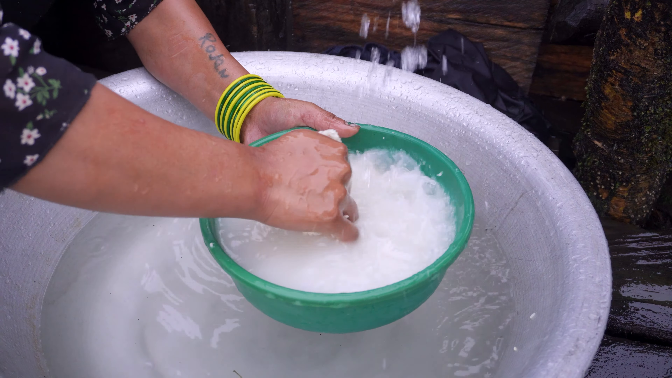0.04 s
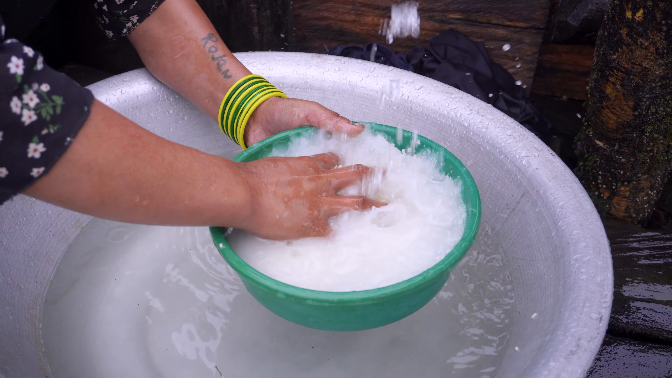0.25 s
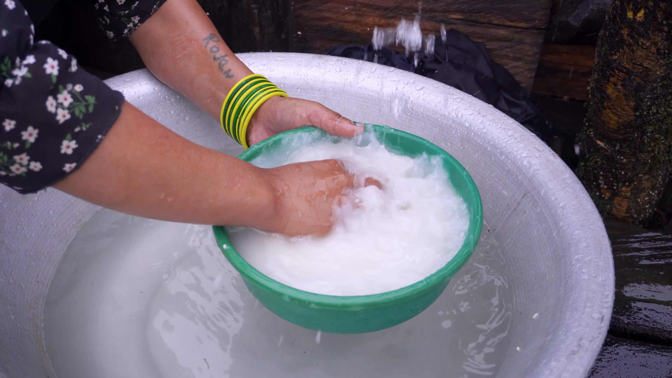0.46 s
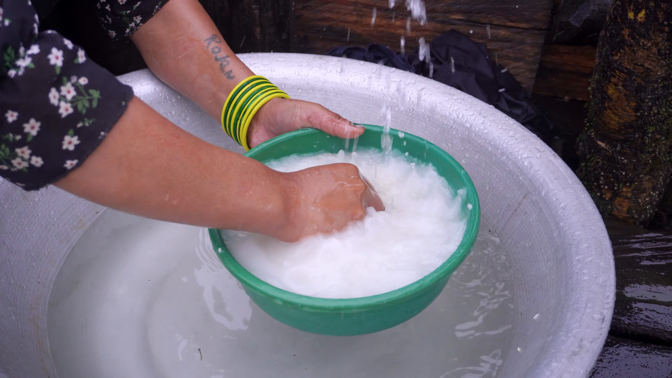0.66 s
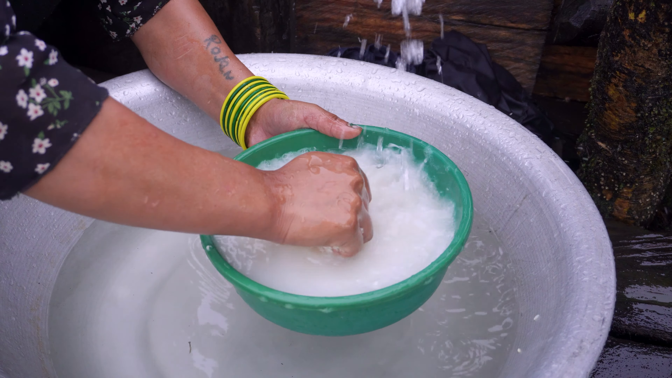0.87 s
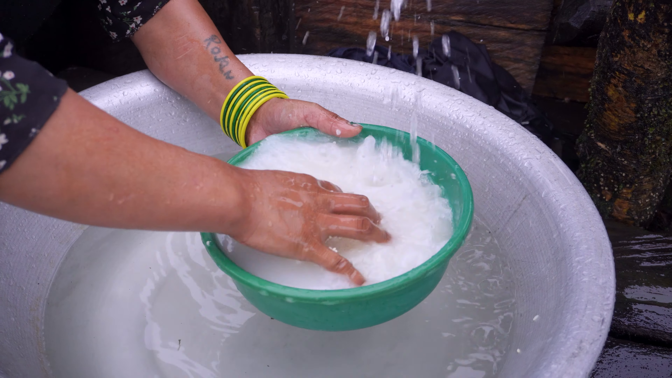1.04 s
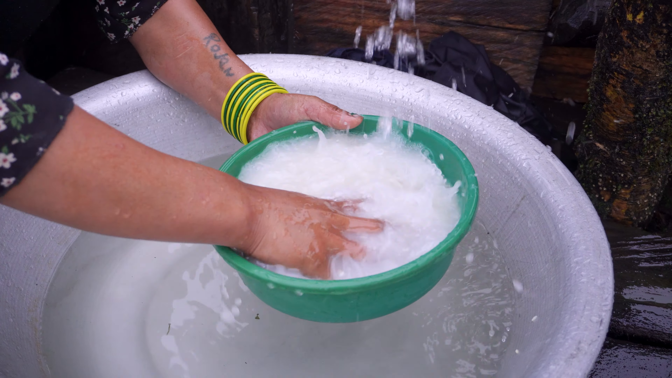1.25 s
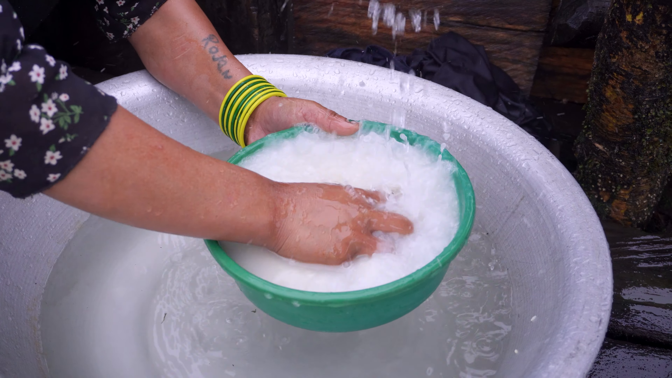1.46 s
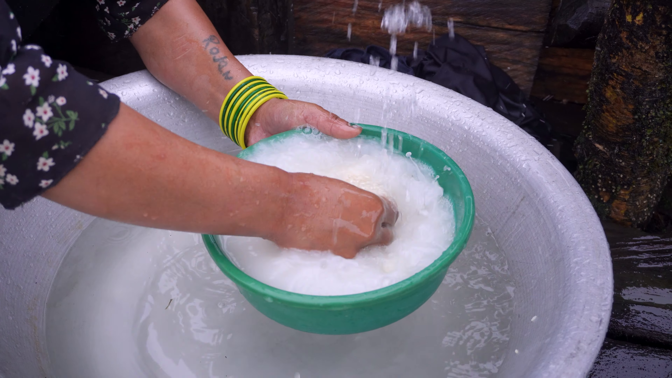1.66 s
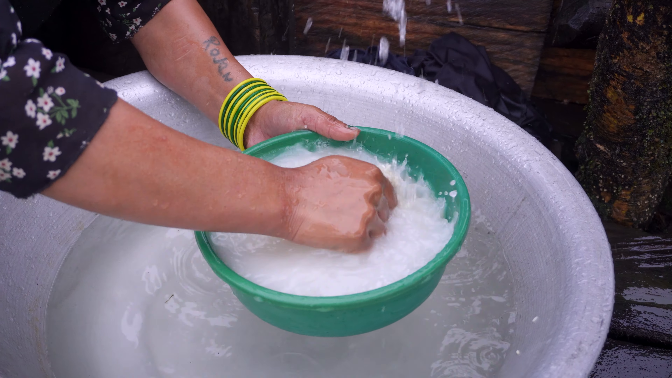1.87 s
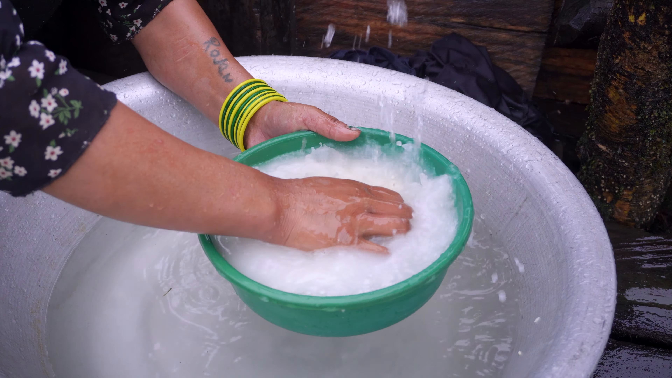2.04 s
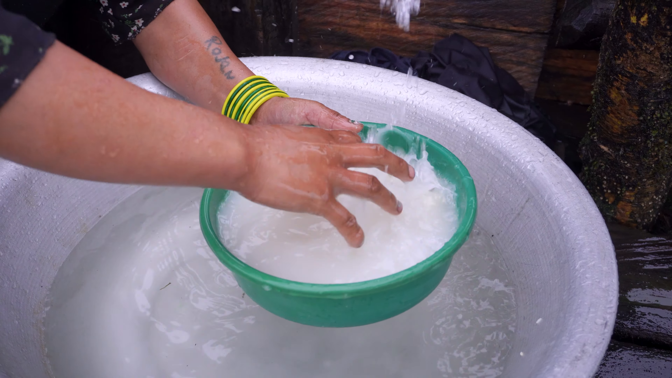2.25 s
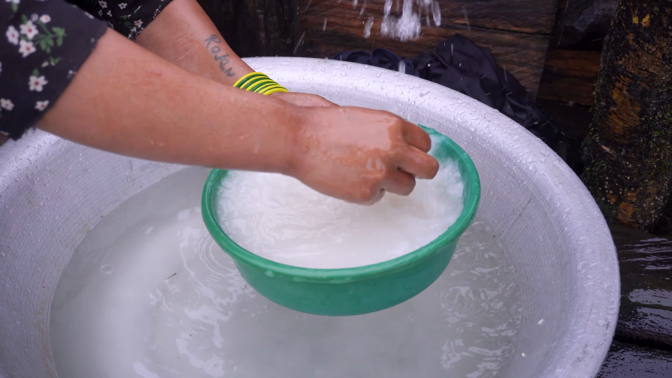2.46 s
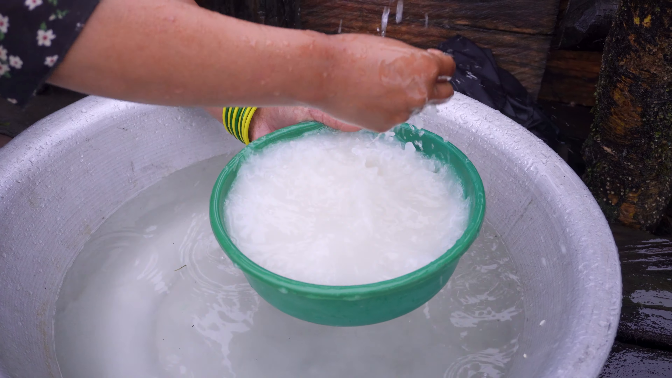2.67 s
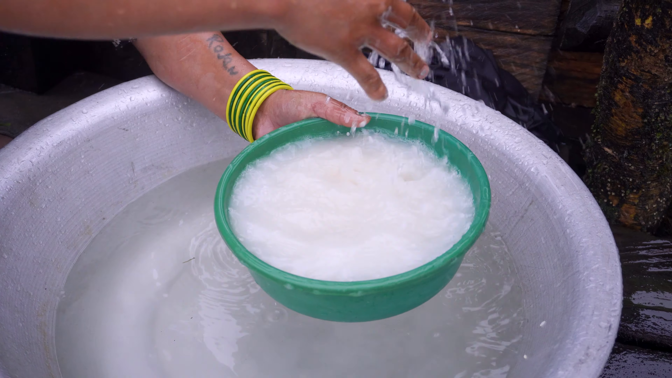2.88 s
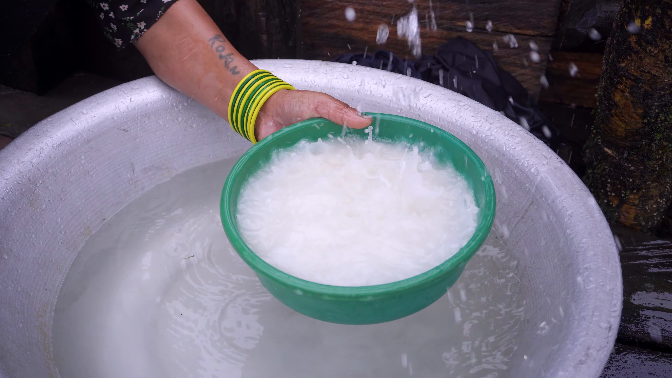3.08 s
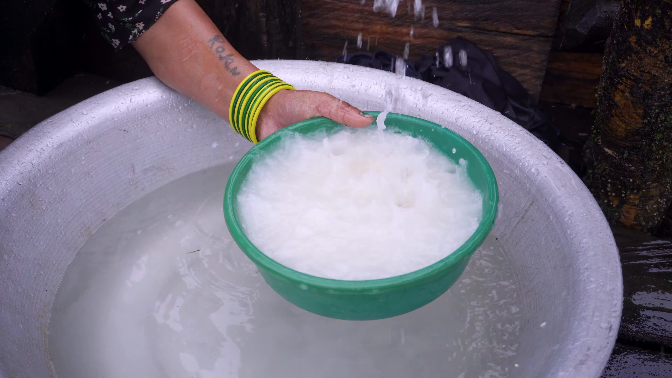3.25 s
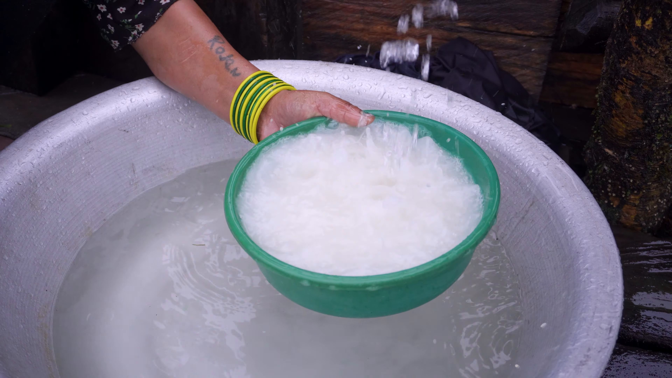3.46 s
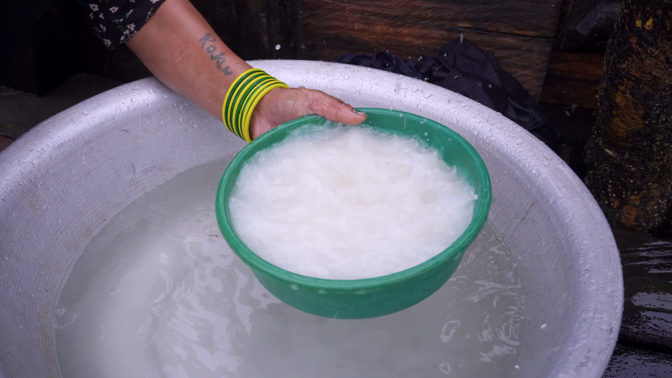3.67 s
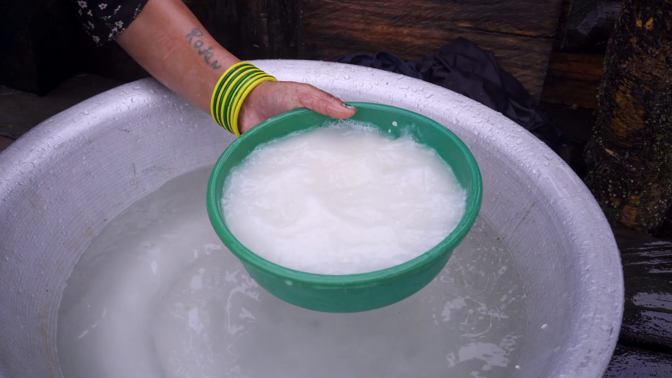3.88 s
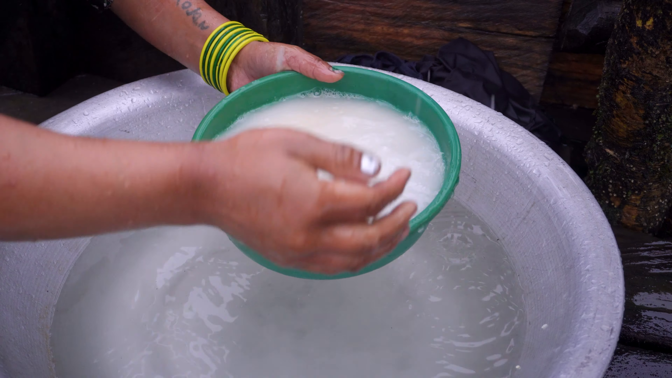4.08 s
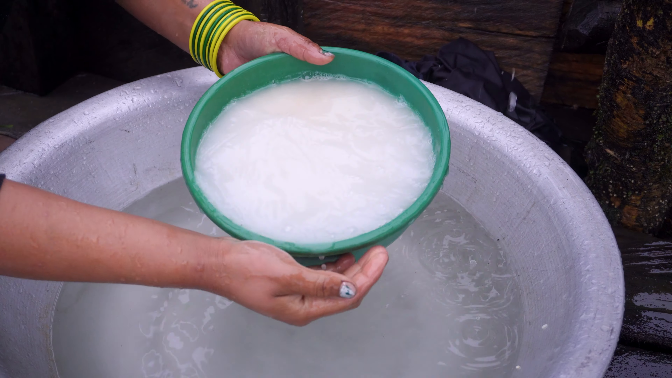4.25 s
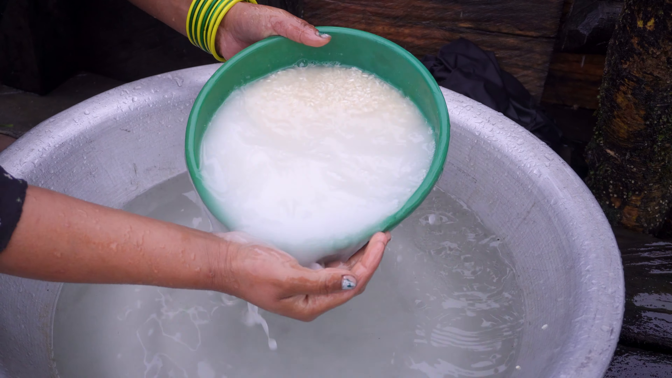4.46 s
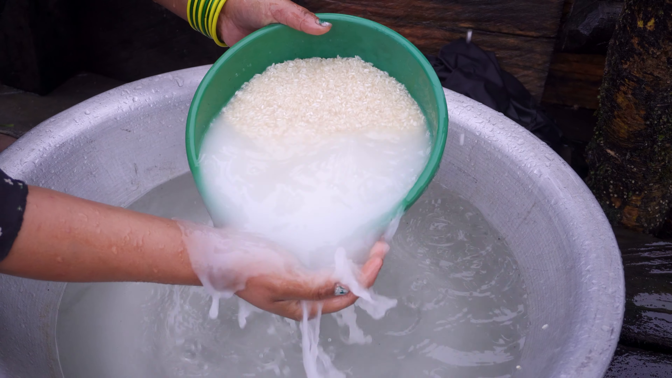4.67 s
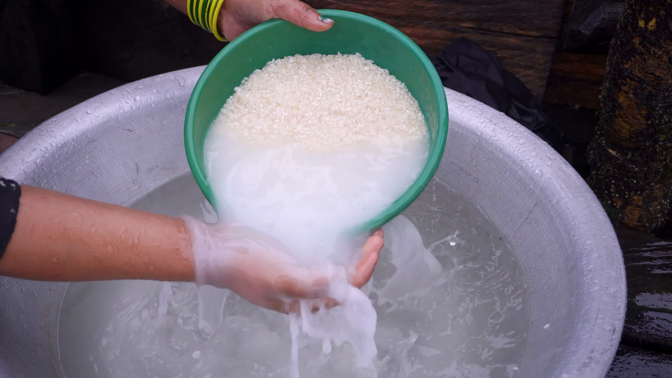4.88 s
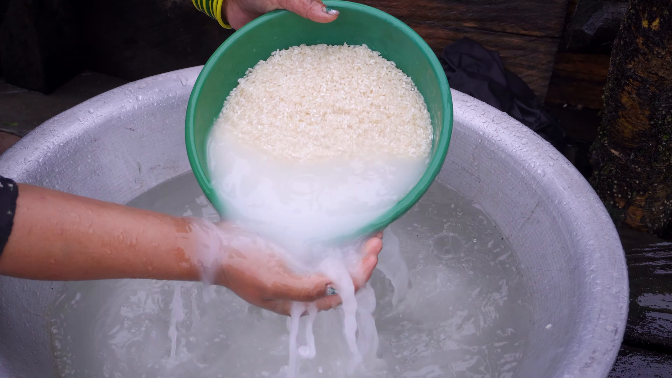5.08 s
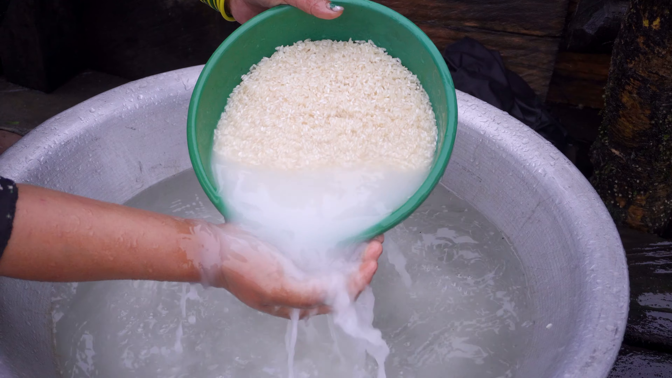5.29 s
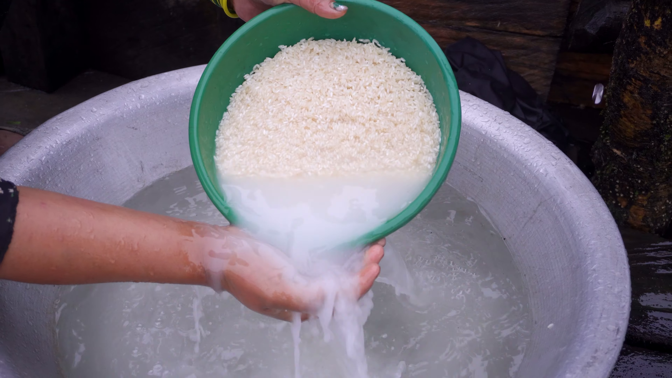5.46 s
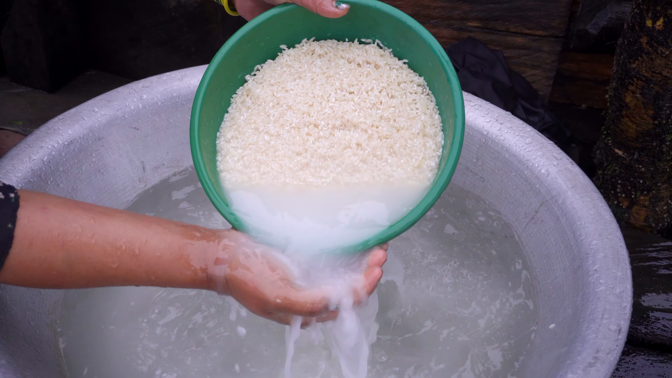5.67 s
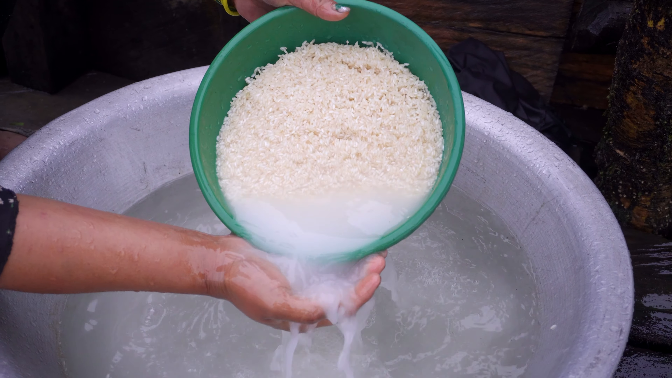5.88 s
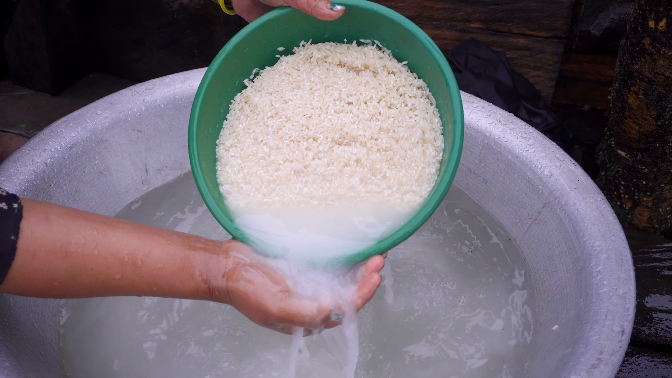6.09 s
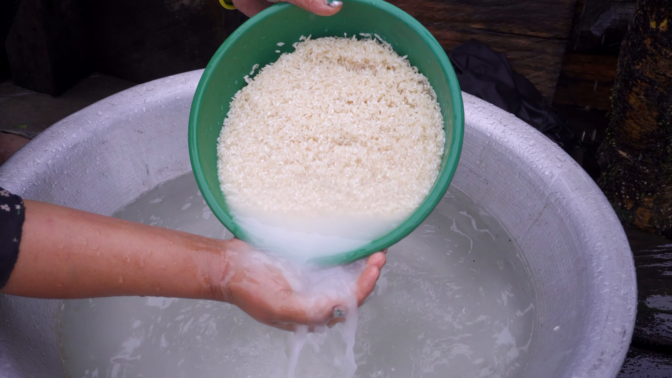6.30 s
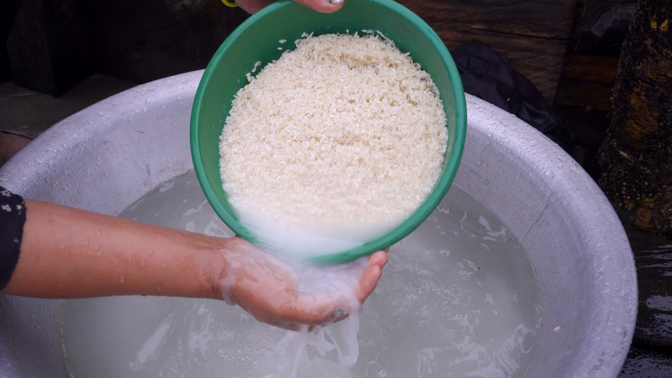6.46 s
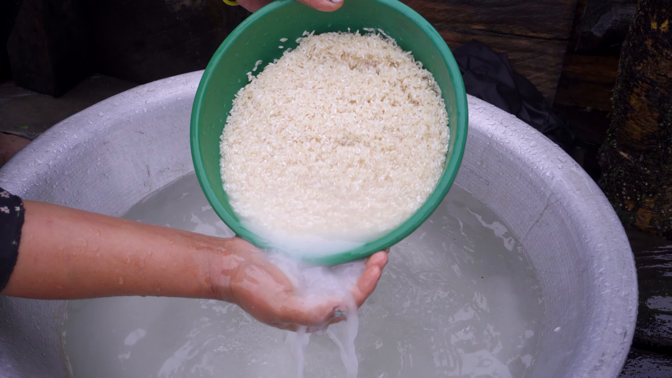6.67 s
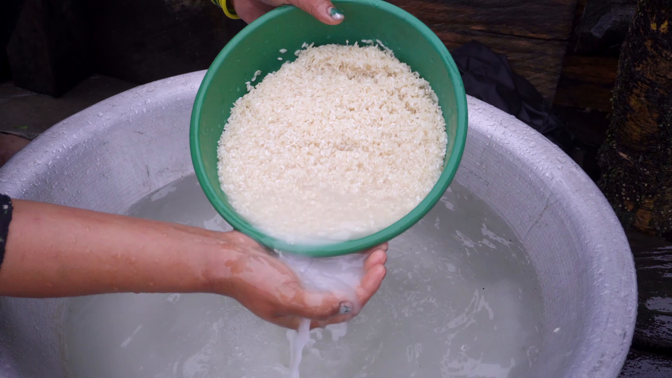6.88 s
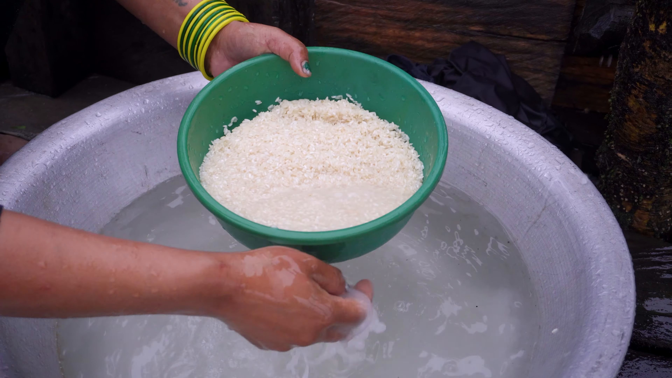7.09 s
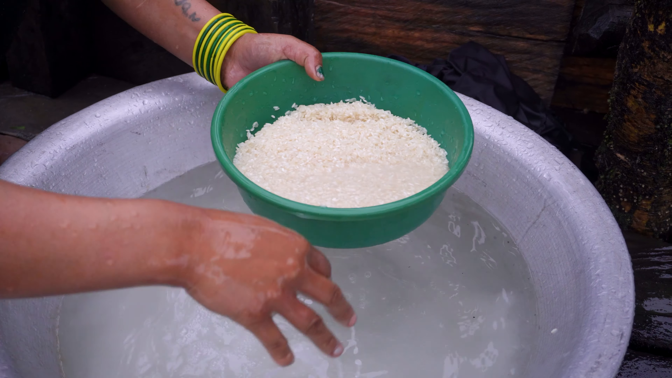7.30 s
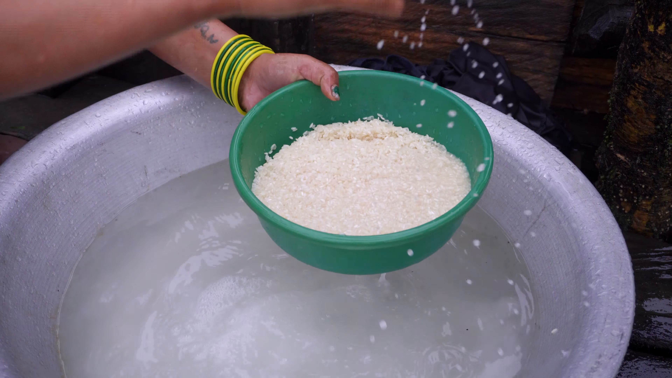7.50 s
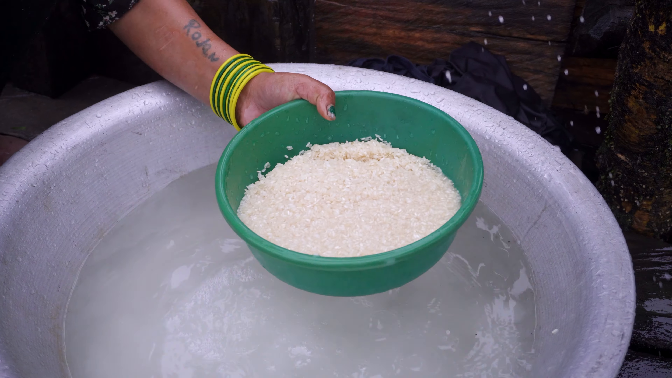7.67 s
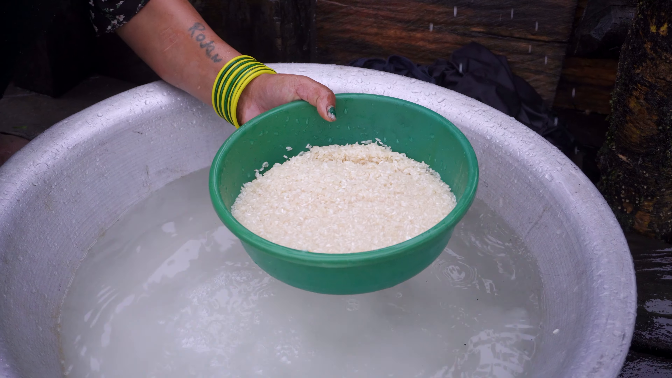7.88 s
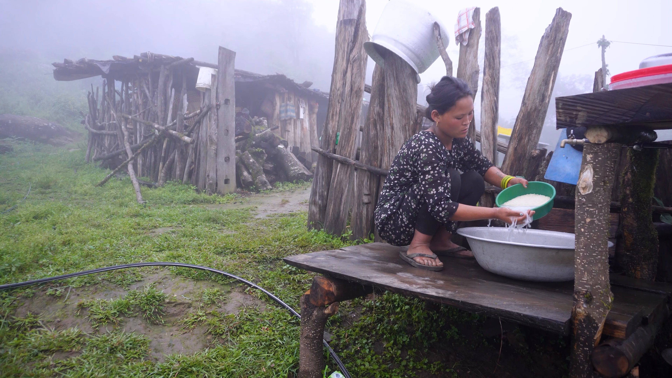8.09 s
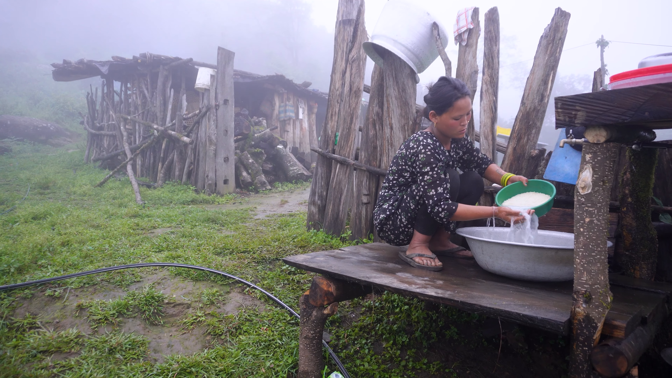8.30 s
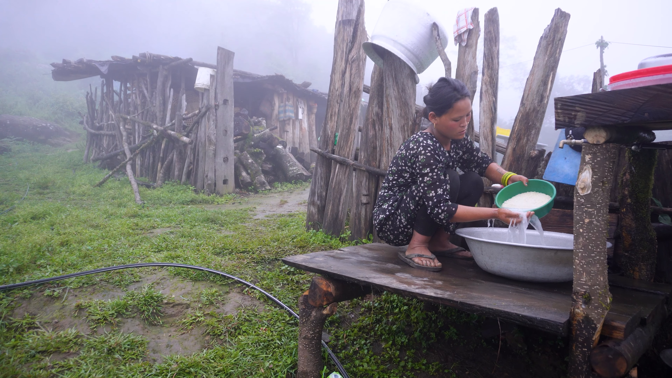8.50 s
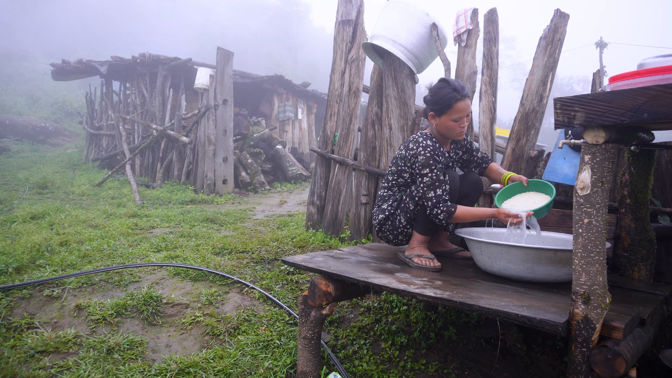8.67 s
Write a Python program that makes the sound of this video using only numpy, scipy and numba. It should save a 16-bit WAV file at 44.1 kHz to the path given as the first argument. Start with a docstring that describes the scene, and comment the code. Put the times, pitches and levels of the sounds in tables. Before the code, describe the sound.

Close plinking and spattering water drops with small plops, a lull, a gurgling pour over a cupped hand, then a more distant, deeper trickle outdoors.

```python
"""Water falls in drops into a bowl of soaking rice, stops, is poured off over a hand into a metal basin,
and is poured again further away. Each impact spatters, as short bursts of noise, and traps air that rings as
damped sines: clear drops plink, and other bubbles hold or slide in pitch, from low plops to high far-off drips.
Quick reflections follow from the basin. Faint birds and a hum are thin wavering tones in the damp air, which
is soft coloured noise."""
import sys
import numpy as np
from scipy import signal
from scipy.fft import rfft, irfft
from scipy.io import wavfile
from scipy.ndimage import uniform_filter1d
from numba import njit

SR = 44100
rng = np.random.default_rng(int(sys.argv[2]) if len(sys.argv) > 2 else 0)


def output_pcm(signal):
    """Save a mono or channel-first signal as 16-bit PCM at the path in sys.argv[1].

    Samples are clipped to [-1, 1] before scaling.
    """
    pcm = np.clip(np.atleast_2d(signal).T, -1, 1) * 32767
    wavfile.write(sys.argv[1], SR, np.round(pcm).astype(np.int16))


N = 385434
TIME = np.arange(N) / SR
OPPOSITE = np.array([[1], [-1]])  # signs of the side signal, left and right


def undb(db):
    """Level law: decibels to an amplitude ratio."""
    return 10 ** (np.asarray(db) / 20)


def read(table, hz):
    """Spectral interpolation: read a (Hz, dB) table on a log-frequency axis."""
    table_hz, table_db = np.array(table).T
    return np.interp(np.log(hz + 1), np.log(table_hz), table_db)


def colour(x, table):
    """Linear filtering: weight the spectrum by a (Hz, dB) table."""
    gain = undb(read(table, np.fft.rfftfreq(N, 1 / SR)))
    return irfft(rfft(x) * gain, N)


def filtered(x, order, hz, kind="low"):
    """Butterworth filtering: a maximally flat passband."""
    return signal.sosfilt(signal.butter(order, hz, kind, fs=SR, output="sos"), x)


def unit(x):
    """Normalisation: scale to an rms of 1."""
    return x / np.sqrt(np.mean(x ** 2))


def wander(samples):
    """Random modulation: twice-smoothed noise of rms 1; a longer window makes it slower."""
    noise = rng.standard_normal(N)
    return unit(uniform_filter1d(uniform_filter1d(noise, size=samples), size=samples))


def rare(chance):
    """Truncated exponential statistics: mostly small, now and then large, never huge."""
    return np.minimum(-np.log(chance), 3.6)


# Unlike part of the two channels. Each row: frequency in Hz, level against the like part in dB.
UNLIKE_PART = [(40, -36), (150, -10.5), (2000, -8), (4000, -2.5), (15000, -9)]


def hiss(table):
    """Partial coherence: two-channel noise of rms 1, mostly alike left and right."""
    mid, side = rng.standard_normal((2, N))
    return unit(colour(mid + colour(side, UNLIKE_PART) * OPPOSITE, table))


@njit
def ring(n, start, hz, cycles, size, glide, pan, rise):
    """Damped resonance: bubbles swell over `rise` cycles, fade over `cycles` and may climb ever faster in pitch."""
    out = np.zeros((2, n))
    for k in range(len(start)):
        step = 2 * np.pi * hz[k] / SR
        phase, fade, onset = 0., 1., 1.
        fade_step = np.exp(-hz[k] / SR / cycles[k])
        onset_step = np.exp(-hz[k] / SR / rise)
        for i in range(start[k], n):
            phase += step
            # the climb quickens as the bubble nears the surface
            step = min(step * (1 + 2 * (glide[k] - 1) * (1 - fade)), 2.5)
            fade *= fade_step
            onset *= onset_step
            value = size[k] * fade * (1 - onset) * np.sin(phase)
            out[0, i] += value * pan[k]
            out[1, i] += value / pan[k]
            if fade < .003:
                break
    return out


def bubbles(s, hz, cycles, db, octaves, pan_db, rise):
    """Bubble resonance: bubbles at times s; `octaves` sets the climb rate, nominally per 40 ms."""
    cycles = cycles + 0 * hz
    octaves = np.maximum(octaves, 0) + 0 * hz
    glide = 2 ** (octaves / .04 / SR)
    return ring(N, (s * SR).astype(int), hz, cycles, undb(db), glide, undb(pan_db / 2), rise)


def bursts(s, db, fade_s, rise_s):
    """Impulse response: an envelope that swells quickly at each impact and dies away."""
    kicks = np.zeros(N)
    np.add.at(kicks, (s * SR).astype(int), undb(db))
    rise, fade = np.exp(-1 / (rise_s * SR)), np.exp(-1 / (fade_s * SR))
    return signal.lfilter([1 - rise], np.convolve([1, -rise], [1, -fade]), kicks)


def swarm(flow, sizes, count, clump, clump_db, scatter_db, cycles, octaves, pan_db, rise):
    """Clustered arrivals: `count` random bubbles a second, a clump to each gob of water; rms 1 while they last."""
    start, length = flow[0][0], flow[-1][0] - flow[0][0]
    when, late, pitch, size, life, climb, side = rng.random((int(count * length), 7)).T
    gob_s, gob_size = rng.random((len(when) // clump, 2)).T
    gob = (when * len(gob_s)).astype(int)
    s = start + (gob + gob_s[gob]) / len(gob_s) * length
    s = np.clip(s - .01 * np.log(late), 0, TIME[-1])  # bubbles trail their gob by 10 ms on average
    low, high = sizes[0][0], sizes[-1][0]
    hz = low * (high / low) ** pitch
    db = clump_db * rare(gob_size[gob]) + scatter_db * rare(size)
    sound = bubbles(s, hz, cycles * (.5 + life), db + read(sizes, hz),
                    octaves * climb ** 2, pan_db * (2 * side - 1), rise)
    return unit(sound) * np.sqrt(length * SR / N), s, db


# Spectrum of the spatter. Each row: frequency in Hz, relative level in dB per Hz.
SPATTER_COLOUR = [(500, -32), (1500, -4), (3200, 7), (5500, 5), (7000, 2), (9300, 1), (11000, 5.5),
                  (13500, -1), (15600, 3.5)]


def coarse_and_fine_spray():
    """Broadband radiation: spatter noise split at 9500 Hz into coarse and fine spray."""
    noise = hiss(SPATTER_COLOUR)
    return filtered(noise, 4, 9500), filtered(noise, 4, 9500, "high")


# Small bubble sizes. Each row: pitch in Hz, relative level in dB.
SMALL_SIZES = [(1750, -3), (2300, -0.5), (3200, 6), (4300, 6.5), (5500, -3.5), (8000, -9.5)]
# Droplets that only tick. Each row: pitch in Hz, relative level in dB.
TICK_SIZES = [(5500, 5.5), (9300, 1.5), (15800, 7)]


def stream(flow, large_sizes, large_db, large_db_per_s, spatter_db, large_octaves,
           count, clump_db, gurgle_db, steady_db, cycles, spray):
    """Superposition of impacts: small and large bubbles, spatter and ticks; levels in dB against the small bubbles."""
    s, db = np.transpose(flow)

    def level(points):
        return np.interp(TIME, s, points, left=-120, right=-120)  # silent outside the flow

    small_level = level(db)
    large_level = level(db + large_db + large_db_per_s * (s - s[0]))
    spatter_level = level(db + spatter_db)
    small, impact_s, impact_db = swarm(flow, SMALL_SIZES, count=count, clump=10, clump_db=clump_db,
                                       scatter_db=2.5, cycles=cycles, octaves=.5, pan_db=1.6, rise=0.9)
    large, _, _ = swarm(flow, large_sizes, count=count // 4, clump=3, clump_db=gurgle_db,
                        scatter_db=gurgle_db, cycles=6.65, octaves=large_octaves, pan_db=-0.5, rise=0.23)
    # every impact throws its own mix of coarse and fine spray
    spatter = 0
    for noise, share in zip(spray, rng.random((len(impact_s), 2)).T):
        throws = bursts(impact_s, 1.5 * impact_db + 4.5 * rare(share), .0025, .001)
        spatter = spatter + noise * (throws + undb(steady_db))
    spatter = spatter / np.sqrt(np.mean(spatter[:, small_level > -100] ** 2))
    ticks, _, _ = swarm(flow, TICK_SIZES, count=count // 6, clump=3, clump_db=3.5,
                        scatter_db=3, cycles=2.2, octaves=0, pan_db=3.5, rise=.6)
    water = small * undb(small_level) + large * undb(large_level)
    water = water + (spatter + ticks * undb(-4.0)) * undb(spatter_level)
    # the thinner the flow, the more it breaks into separate trickles
    depth_db = np.clip(1 + .25 * (small_level.max() - small_level), 0, 4)
    return water * undb(wander(320) * depth_db)


# Flow into the bowl. Each row: time in s, nominal level of the small bubbles in dB.
BOWL_FLOW = [(0, -34), (.5, -34.5), (1.4, -33), (2.7, -36.5), (3.3, -34.5), (3.65, -36), (3.675, -52)]
# Large bubble sizes. Each row: pitch in Hz, relative level in dB.
LARGE_SIZES = [(330, -20), (450, -12), (700, 2.5), (1000, 8.5), (1900, 8)]


def falling_water(spray):
    """Intermittent flow: gobs fall apart from each other into the bowl."""
    return stream(BOWL_FLOW, LARGE_SIZES, large_db=-17.5, large_db_per_s=-2, spatter_db=-5, large_octaves=1.7,
                  count=1500, clump_db=5.0, gurgle_db=-2.0, steady_db=14.0, cycles=4.3, spray=spray)


# Air noise spectrum. Each row: frequency in Hz, relative level in dB per Hz.
AIR_COLOUR = [(22, -44), (40, -13), (200, -6.5), (363, -12), (1020, -13), (3400, -10.5), (6000, -13.5),
              (9200, -21.5), (14000, -20), (15700, -14.5)]
# Birds high and a hum low. Each row: start in s, length in s, pitch in Hz, nominal peak level in dB.
FAINT_NOTES = [(3.84, .13, 3460, -56), (4.1, .045, 3980, -58), (4.23, .1, 3420, -54.5),
               (4.33, .05, 2800, -54), (3.2, .34, 208, -62), (7.83, .2, 203, -63)]


def outdoors():
    """Background noise with tonal components: soft air noise and thin, faint, wavering notes."""
    air = hiss(AIR_COLOUR) * undb(-53)
    # at the further place the bass below 320 Hz is about 7 dB stronger
    air = air + filtered(air, 2, 320) * (undb(7) - 1) * (TIME > 8.06)
    waver = wander(400)
    phase_s = np.cumsum(1 + .008 * waver) / SR
    for s, length, hz, db in FAINT_NOTES:
        shape = np.sin(np.pi * np.clip((TIME - s) / length, 0, 1)) ** .5
        air = air + undb(db + 3 * waver) * shape * np.sin(2 * np.pi * hz * phase_s)
    return air


# Clear drops. Each row: time in s, nominal level in dB, bubble pitch in Hz, bright slap against that level in dB.
CLEAR_DROPS = [(0.0353, -13.5, 3280, -42), (0.1495, -11.5, 3420, -16), (0.275, -10, 3930, -13),
               (0.327, -10, 3660, -21), (0.3599, -5, 4270, -11.5), (0.4035, -12, 2220, -14),
               (0.4337, -11, 3980, -13), (0.5797, -12.5, 3530, -6.5), (0.736, -13, 4630, -36),
               (0.7603, -32, 4240, -32), (0.7835, -29, 2900, 5), (0.814, -22, 3640, -5),
               (0.8393, -14, 3960, -32), (0.8765, -16, 3100, -33), (0.9342, -15, 4170, -17),
               (1.0125, -22.5, 5840, 0), (1.1324, -16.5, 2310, -15), (1.207, -13.5, 5700, -9),
               (1.2455, -11.5, 3250, -11.5), (1.3007, -9.5, 3000, -12), (1.357, -15, 3860, -16),
               (1.3927, -16.5, 2850, -20), (1.5422, -10.5, 2050, -11.5), (1.7817, -14, 3270, -18),
               (1.8814, -15.5, 3570, -24), (1.905, -14.5, 3170, -15), (1.963, -12.5, 3100, -13),
               (2.0039, -16, 2500, -6), (2.1847, -25, 3590, -20), (2.203, -11, 3500, -31),
               (2.213, -20, 2280, -6), (2.313, -16.5, 3400, -28), (2.3455, -15, 3350, -6),
               (2.3607, -10.5, 3900, -9.5), (2.482, -9.5, 2980, -16), (2.518, -9.5, 3400, -18),
               (2.5697, -11.5, 3130, -14), (2.905, -14, 3900, -16), (3.042, -9, 4200, -33),
               (3.1566, -9.5, 2840, -44), (3.197, -9, 3200, -14), (3.2463, -7, 6740, -35),
               (3.3421, -11.5, 3170, -14), (3.4134, -15.5, 3200, -4), (3.458, -14.5, 3400, -19),
               (3.4967, -7.5, 3000, -13.5), (3.545, -29, 3030, -20), (3.5578, -14.5, 2790, -5.5),
               (3.6272, -14, 4240, -13.5), (3.7755, -25.5, 3060, -40), (3.783, -31, 4400, -18),
               (3.831, -19.5, 4300, -12), (4.3287, -26, 2790, -23), (4.614, -20, 3310, -13),
               (4.6374, -20, 3190, -14.5), (4.6748, -23.5, 4930, -22), (4.6984, -25, 4200, -29),
               (4.726, -25, 3460, -22), (4.7681, -28, 2420, -38), (4.781, -20.5, 4180, -21),
               (4.8306, -17.5, 3060, -27), (4.9437, -16, 4320, -39.5), (5.166, -10.5, 3300, -13),
               (5.426, -14.5, 3300, -34), (5.4873, -14, 2950, -34), (5.7886, -15, 2700, -11),
               (6.184, -15, 4980, -12), (6.874, -31, 2520, -23), (7.198, -15, 4070, -14.5),
               (7.2573, -12.5, 2670, -18), (7.3564, -9.5, 3370, -13), (7.4986, -32, 3580, -10.5),
               (7.6993, -34.5, 2260, -20), (7.7745, -34.5, 3640, -31), (7.8314, -20, 6450, -41)]


def drops():
    """Impact and bubble resonance: a plink, a little spray and a bright slap; harder slaps go with shorter plinks."""
    s, db, hz, slap_db = np.transpose(CLEAR_DROPS)
    life, side = rng.random((len(s), 2)).T
    cycles = np.clip(-.25 * slap_db, 1.5, 7) * (0.69 + 0.5 * life)
    plinks = bubbles(s, hz, cycles, db + 0.5, 2.3 * life, 4.0 * (2 * side - 1), 0.48)
    spray = unit(filtered(rng.standard_normal(N), 2, [1500, 6500], "band"))
    spray = spray * bursts(s, db - 16.5, 0.0048, 0.0015)
    slaps = hiss(SPATTER_COLOUR) * bursts(s, db + slap_db + 7, 0.002, 0.001)
    return filtered(plinks + spray + slaps, 3, 1100, "high")


# Bubbles that hold or slide in pitch, from low plops to high far-off drips.
# Each row: start in s, nominal level in dB, start pitch in Hz, end pitch in Hz, length in s.
GLIDING_BUBBLES = [(0.151, -24.5, 1114, 1450, 0.029), (0.215, -26, 1320, 1870, 0.01),
                   (0.273, -32.5, 603, 1820, 0.034), (0.349, -30, 680, 1300, 0.024),
                   (0.493, -28, 825, 1470, 0.029), (0.584, -45.5, 787, 1030, 0.1),
                   (0.818, -33, 970, 1610, 0.0094), (1.058, -25.5, 1470, 1790, 0.016),
                   (1.144, -49, 820, 1770, 0.014), (1.314, -18, 1350, 1700, 0.0051),
                   (1.334, -37, 860, 760, 0.03), (1.354, -34.5, 631, 540, 0.05),
                   (1.395, -27, 833, 970, 0.017), (1.688, -37, 748, 2620, 0.063),
                   (1.896, -32.5, 835, 945, 0.033), (1.929, -23.5, 1007, 825, 0.012),
                   (2.08, -29, 1404, 1800, 0.019), (2.211, -30.5, 1500, 1410, 0.013),
                   (2.359, -41.5, 652, 1210, 0.046), (2.403, -23, 1207, 1670, 0.015),
                   (3.072, -30, 741, 680, 0.023), (3.085, -35.5, 655, 1700, 0.053),
                   (3.261, -44, 750, 930, 0.07), (3.363, -37, 1095, 1650, 0.031),
                   (3.492, -29.5, 1300, 1550, 0.021), (4.618, -25, 1070, 1090, 0.012),
                   (4.63, -34, 726, 1030, 0.025), (4.794, -30, 950, 850, 0.015),
                   (4.808, -35.5, 606, 560, 0.028), (5.016, -30.5, 730, 1000, 0.04),
                   (5.097, -22, 1116, 1250, 0.032), (5.404, -33, 484, 460, 0.046),
                   (5.579, -31, 887, 1010, 0.036), (5.661, -23, 850, 980, 0.017),
                   (6.272, -37.5, 1900, 2470, 0.017), (6.406, -26, 1960, 1880, 0.01),
                   (6.678, -29.5, 1095, 1090, 0.016), (6.952, -28, 1355, 1800, 0.018),
                   (7.195, -34, 1380, 1330, 0.031), (7.253, -30, 850, 1010, 0.017),
                   (7.357, -23, 1007, 905, 0.011), (7.555, -42, 1340, 1320, 0.039),
                   (8.097, -39, 935, 940, 0.018), (8.19, -24, 2870, 2630, 0.025),
                   (8.271, -31, 2410, 2160, 0.022), (8.326, -25.5, 1926, 2210, 0.027),
                   (8.36, -41.5, 480, 540, 0.11), (8.431, -20.5, 2110, 2290, 0.024),
                   (8.66, -27, 2570, 2470, 0.016), (8.675, -27, 514, 437, 0.027)]


def plops_and_drips():
    """Gliding resonance: a splash opens each bubble; it holds or slides in pitch and flutters in the churning surface."""
    tones = np.zeros(N)
    for s, db, hz, end_hz, length in GLIDING_BUBBLES:
        t = np.arange(int(length * SR)) / SR
        pitch = hz + (end_hz - hz) * (t / length) ** 1.55  # holds at first and then bends
        shape = (1 - np.exp(-t * hz * 0.65)) * (1 - t / length)
        shape = shape * pitch / hz  # a higher tone carries better
        first = int(s * SR)
        tones[first:first + len(t)] += undb(db) * shape * np.sin(2 * np.pi * np.cumsum(pitch) / SR)
    s, db = np.transpose(GLIDING_BUBBLES)[:2]
    splash = unit(filtered(rng.standard_normal(N), 2, [800, 3000], "band"))
    return splash * bursts(s, db - 6, .003, .0008) + tones * undb(3.5 * wander(90))


# Flow over the hand. Each row: time in s, nominal level of the small bubbles in dB.
HAND_FLOW = [(4.56, -52), (4.63, -46.5), (4.75, -49), (4.9, -31.5), (5.5, -35.5), (6, -38.5), (6.8, -45.5),
             (7.2, -45.5)]


def pour_over_hand(spray):
    """Dense flow: many small impacts merge into a more even pour."""
    return stream(HAND_FLOW, LARGE_SIZES, large_db=-3.5, large_db_per_s=-1, spatter_db=-4, large_octaves=1,
                  count=2000, clump_db=3.0, gurgle_db=1.05, steady_db=-18, cycles=8.5, spray=spray)


# The cupped hand is emptied in two goes. Each row: time in s, nominal level of the small bubbles in dB.
HAND_SPILL = [(7.18, -56), (7.23, -27.5), (7.31, -41.5), (7.36, -31), (7.41, -59)]


def spill_from_hand(spray):
    """Transient flow: two short surges, sparser and more clumped than the pour."""
    return stream(HAND_SPILL, LARGE_SIZES, large_db=-12, large_db_per_s=20, spatter_db=-11, large_octaves=3,
                  count=1000, clump_db=6.5, gurgle_db=0.5, steady_db=-3.0, cycles=11.0, spray=spray)


# Flow further away. Each row: time in s, nominal level of the small bubbles in dB.
FAR_FLOW = [(8.07, -45.5), (8.18, -45), (8.3, -41), (8.42, -31.5), (8.5, -36.5), (8.74, -36.5)]
# Large bubbles in the deeper water of the further basin. Each row: pitch in Hz, relative level in dB.
FAR_LARGE_SIZES = [(270, -18), (400, 1.5), (560, 1.5), (670, 0.5), (950, 2.5), (1800, 9)]


def pour_further_away(spray):
    """Dense flow into deeper water: an even pour with more low bubbles."""
    return stream(FAR_FLOW, FAR_LARGE_SIZES, large_db=-9.5, large_db_per_s=7, spatter_db=-7.5, large_octaves=0.7,
                  count=2000, clump_db=1.2, gurgle_db=1.5, steady_db=6, cycles=7.5, spray=spray)


def basin(x, wet_db, fade_s):
    """Early reflections from the basin and the boards around it; they shift as the water rocks."""
    t = np.arange(int(.15 * SR)) / SR
    rock = 2 * np.pi * 1.7 * TIME  # 1.7 Hz
    wet = 0
    for share in (np.cos(rock), np.sin(rock)):
        mid, side = rng.standard_normal((2, len(t))) * np.exp(-t / fade_s) * (t > .0015)
        tail = unit(mid + 0.48 * side * OPPOSITE) / np.sqrt(len(t))  # mostly alike in the two channels
        wet = wet + signal.fftconvolve(x * share, tail, axes=1)[:, :N]
    return x + wet * undb(wet_db)


def scene():
    """Superposition of sources: water with its reflections, and the air outdoors."""
    spray = coarse_and_fine_spray()
    water = falling_water(spray) + drops() + plops_and_drips()
    water = water + pour_over_hand(spray) + spill_from_hand(spray) + pour_further_away(spray)
    far = TIME > FAR_FLOW[0][0]
    near_water = basin(water * ~far, wet_db=-9, fade_s=0.007)
    far_water = basin(water * far, wet_db=-1, fade_s=0.022)
    far_water = far_water * undb(-0.5 * OPPOSITE)  # a little more to the right
    # splashes this small send out no bass
    return filtered(near_water + far_water, 2, 260, "high") + outdoors()


# Colour of the two microphone ports. Each row: frequency in Hz, left minus right in dB.
PORT_DIFFERENCE = [(200, -0.5), (600, 2), (3000, 1.7), (9000, 0.5), (13000, 1.5), (15500, 10.5)]


def record(dry):
    """Transducer response: the two microphone ports differ in colour; the top is cut at 15950 Hz."""
    tilt = undb(np.outer([.5, -.5], read(PORT_DIFFERENCE, np.fft.rfftfreq(N, 1 / SR))))
    top_cut = signal.ellip(10, .2, 60, 15950, fs=SR, output="sos")
    return signal.sosfilt(top_cut, irfft(rfft(dry) * tilt, N))


dry = scene()
out = record(dry)
output_pcm(out)
```